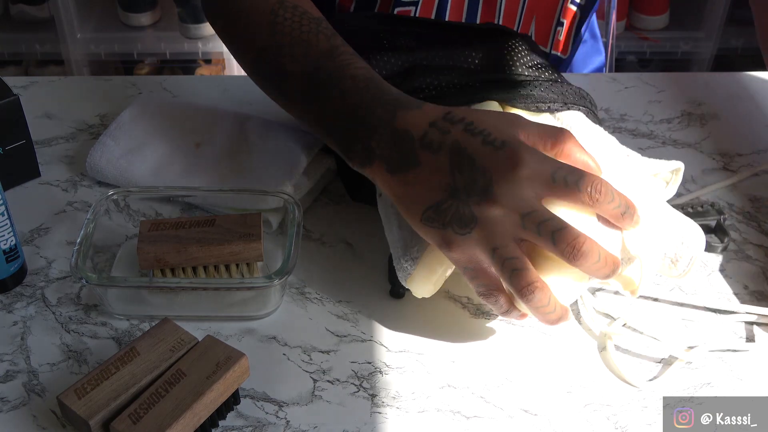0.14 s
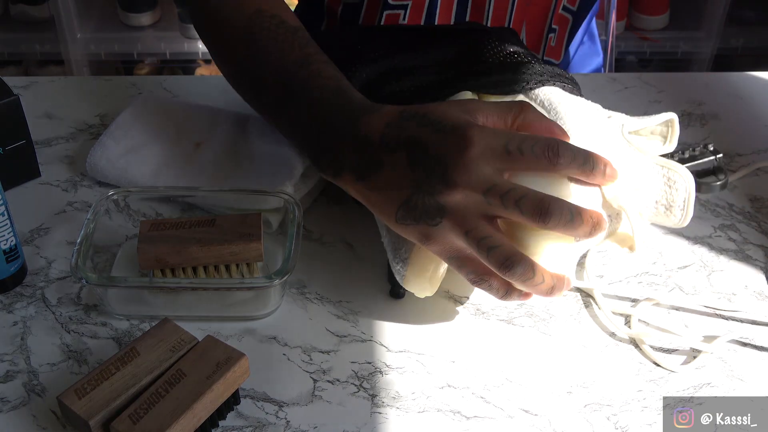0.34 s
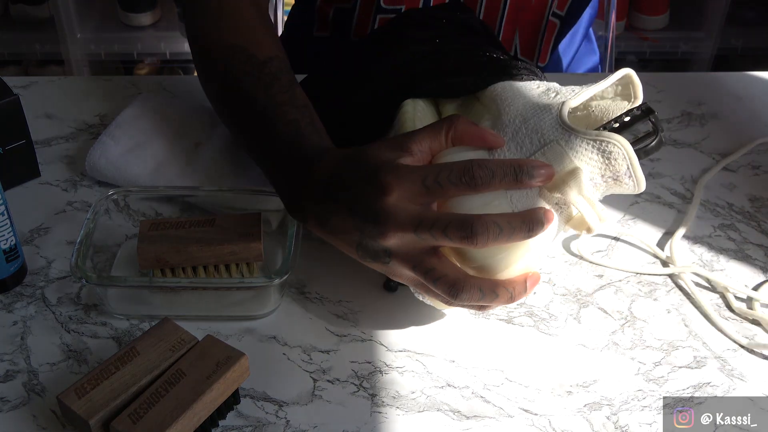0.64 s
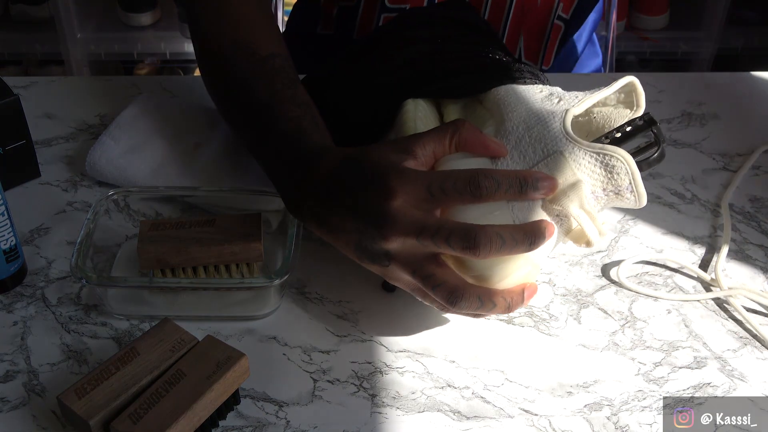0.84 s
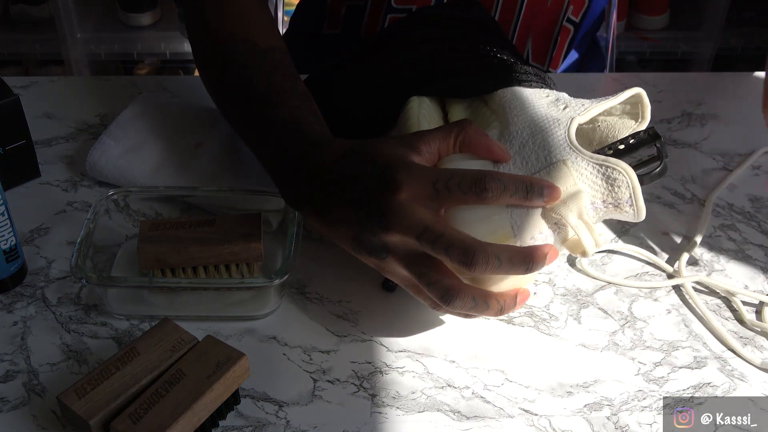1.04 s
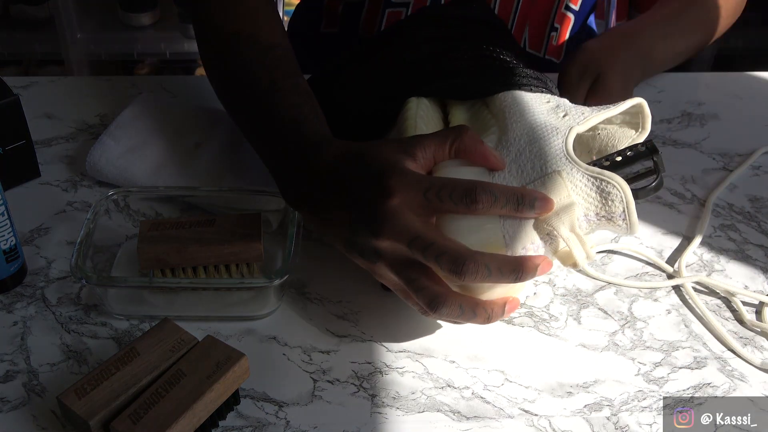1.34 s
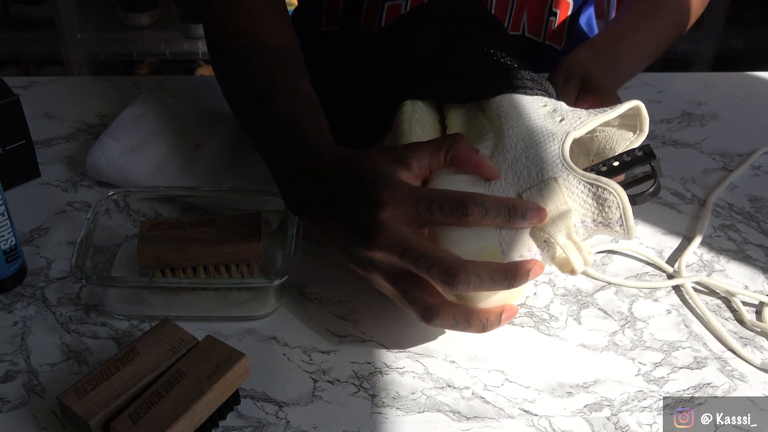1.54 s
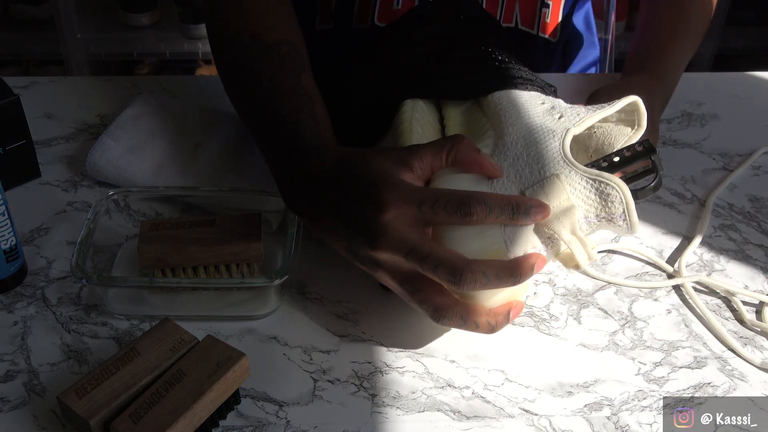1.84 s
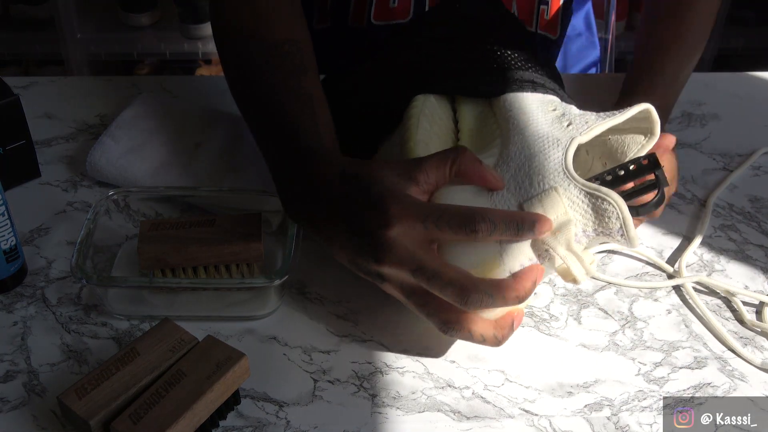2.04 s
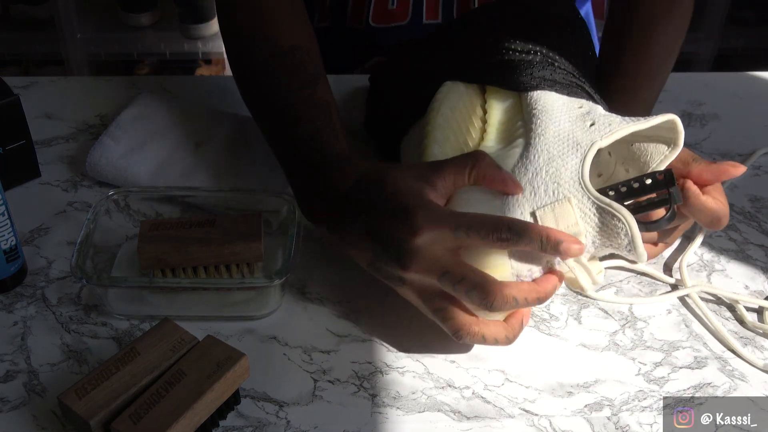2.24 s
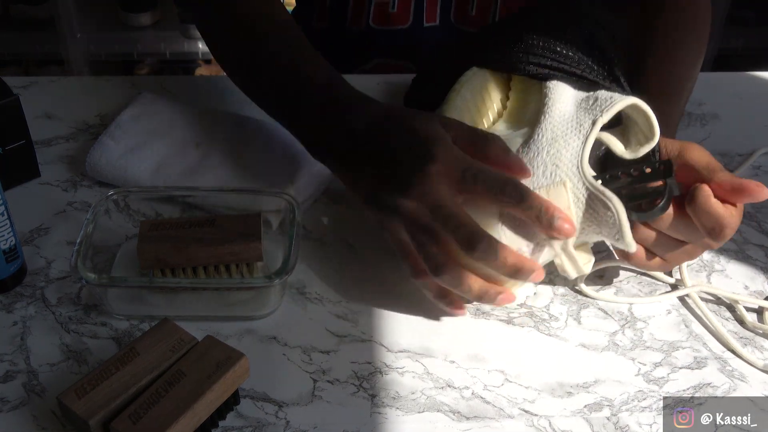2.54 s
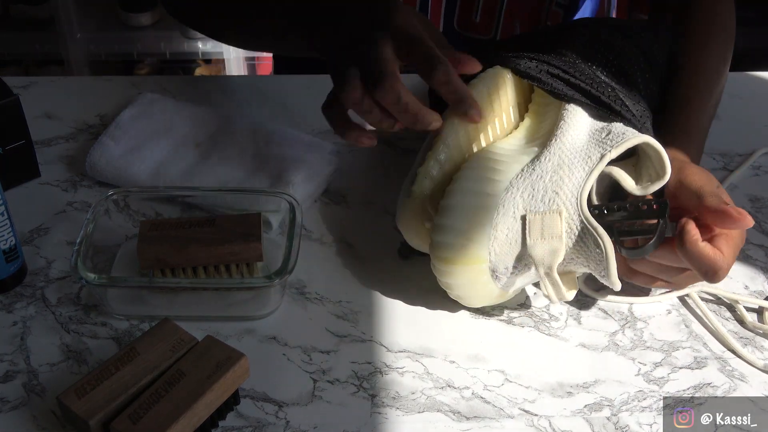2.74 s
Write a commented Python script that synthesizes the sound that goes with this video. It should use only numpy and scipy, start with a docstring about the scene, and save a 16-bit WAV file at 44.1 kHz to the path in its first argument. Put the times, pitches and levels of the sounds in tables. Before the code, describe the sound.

Close up in a small, slightly echoing room, shoes rub and knock on a hollow counter as a hand shifts their mesh bag: busy start, near-quiet middle, then fresh scrapes, thuds and light plastic clacks.

```python
"""Soles drag on a hollow countertop and mesh scrapes; almost at once a thud and a clack fall on top.
Close by in a small room, a hand pushes shoes about in a mesh bag. Friction grains and noise make the
drag, scrape and cloth hiss; slow bass booms under them over a steady floor. Soft pushes ring the counter
as thuds, quick contacts ring a hollow plastic insert as clacks, and short noise bursts tick as lace tips.
The hits return from the room; at the microphone the deepest bass is lost and the top is cut."""
import sys
import numpy as np
from scipy import signal
from scipy.io import wavfile

SR = 44100
rng = np.random.default_rng(int(sys.argv[2]) if len(sys.argv) > 2 else 0)


def to_wav(sig):
    """Store sig (one row per channel, or 1-D mono) as 16-bit WAV at the path in sys.argv[1].

    Samples outside -1..1 are clipped; the rate is SR.
    """
    pcm = np.clip(np.atleast_2d(sig), -1, 1) * 32767
    pcm = np.round(pcm).astype(np.int16)
    wavfile.write(sys.argv[1], SR, pcm.T)  # frames by channels


N = 127890


def amp(db):
    """dB to gain."""
    return 10 ** (np.asarray(db) / 20)


def rms_one(x):
    """Scale to rms 1."""
    return x / np.sqrt(np.mean(x ** 2) + 1e-20)


def level(rows, column=1):
    """Gain over time, interpolated in dB between the rows of a table."""
    columns = np.transpose(rows)
    return amp(np.interp(np.arange(N) / SR, columns[0], columns[column]))


def band(x, low_hz, high_hz, order=2):
    """Band-pass."""
    return signal.sosfilt(signal.butter(order, [low_hz, high_hz], "band", fs=SR, output="sos"), x)


def steep(x, hz, kind):
    """Third-order low- or high-pass."""
    return signal.sosfilt(signal.butter(3, hz, kind, fs=SR, output="sos"), x)


def drift(rate_hz):
    """Slow random wander of rms 1: noise through two equal low-pass poles."""
    step = 40  # samples between the slow values
    pole = np.exp(-2 * np.pi * step * rate_hz / SR)
    noise = rng.standard_normal(N // step + 2002)
    slow = signal.lfilter([1], [1, -2 * pole, pole * pole], noise)[2000:]  # drop the settling
    return np.interp(np.arange(N) / step, np.arange(len(slow)), rms_one(slow))


def ring(x, hz, t60):
    """A damped mode: a unit click sets a sine of height 1 ringing, 60 dB down after t60 seconds."""
    r = amp(-60 / (t60 * SR))
    w = 2 * np.pi * hz / SR
    return signal.lfilter([0, np.sin(w)], [1, -2 * r * np.cos(w), r * r], x + 1e-18)


def grains(per_s, spread_db):
    """Random clicks of uneven size and either sign, as friction slips; rms 1."""
    size = amp(spread_db * np.minimum(rng.exponential(1, N), 5)) * rng.choice([-1, 1], N)
    return rms_one(size * (rng.random(N) < per_s / SR))


def coloured(pair, spectrum, patchy_db):
    """Half-octave bands, taken in turn from two signals, each with its level and flicker; rms 1."""
    table_hz, table_db = np.transpose(spectrum)
    edges = 30 * 2 ** np.arange(0, 9.3, .5)
    out = 0
    for k, (low, high) in enumerate(zip(edges, edges[1:])):
        mid = np.sqrt(low * high)
        if table_hz[0] < mid < table_hz[-1] * 1.1:
            db = np.interp(np.log(mid), np.log(table_hz), table_db)
            out = out + band(pair[k % 2], low, high) * amp(db + patchy_db * drift(8.8))
    return rms_one(out)


def sliding(rows, spectrum, per_s, spread_db, smooth, modes, modes_gain, patchy_db):
    """Friction grains on smooth noise, partly coloured broadly, partly ringing a body."""
    gain = level(rows)
    rub = np.array([grains(per_s, spread_db) + smooth * rng.standard_normal(N) for _ in range(2)])
    body = sum(amp(db) * ring(rub[0] * gain * modes_gain, hz, t60) for hz, db, t60 in modes)
    # expected rms of the ringing modes under a steady rub
    mode_power = sum(amp(db) ** 2 * t60 * SR / (4 * np.log(1000)) for hz, db, t60 in modes)
    body_rms = np.sqrt(mode_power * np.mean(rub ** 2))
    return gain * coloured(rub, spectrum, patchy_db) + body / body_rms


def add(out, s, x):
    """Mix x in at time s."""
    i = max(int(s * SR), 0)
    out[i:i + len(x)] += x[:len(out) - i]


# soles dragging on the counter: [t/s, level/dB, gain of the part above the split/dB]
DRAG = [(0, -21, 7.5), (.04, -23.5, 3), (.08, -26, 0.5), (.2, -26.5, 1), (.26, -35.5, -2.5),
        (.38, -45.5, -1), (.5, -40, 3.5), (.6, -37, 1.5), (.73, -29.5, 0.5), (.88, -37.5, -2),
        (.96, -48.5, 2.5), (1.05, -46, 1), (1.2, -62.5, 1.5), (1.27, -57.5, 1), (1.32, -38.5, 3.5),
        (1.39, -42.5, -4.5), (1.46, -35.5, 0.5), (1.515, -44, 5), (1.55, -34, 4.5), (1.61, -42.5, 5),
        (1.68, -47.5, -3), (1.74, -42, 2), (1.82, -51, -4), (1.87, -42.5, -3), (2.07, -45.5, 1.5),
        (2.14, -33.5, 1), (2.28, -27, -3), (2.35, -33.5, -2), (2.42, -30, 5.5), (2.5, -35, 6),
        (2.56, -44, 0), (2.64, -41, 0.5), (2.69, -32.5, 1), (2.8, -27.5, -1.5), (2.9, -35, -11)]
# broad colour of the drag: [f/Hz, level/dB per Hz]
DRAG_COLOUR = [(53, -43), (90, -16), (166, -18), (263, 6), (285, -11), (353, 1), (397, -6), (520, -3),
               (698, -13.5), (1500, -13), (1950, -55), (3300, -120)]
# modes of the hollow counter, also rung by the thuds: [f/Hz, level/dB, full t60/s]
COUNTER_MODES = [(126.5, -21, 0.36), (171.5, 2, 0.3), (213, -12, 0.059), (283.4, -9.5, 0.16),
                 (353.4, 2, 0.25), (417, -8, 0.39), (518.3, -9.5, 0.25), (661.6, -5.5, 0.12),
                 (849, -9, 0.072)]
DRAG_SLIPS_PER_S, DRAG_IN_COUNTER_DB, DRAG_SPLIT_HZ = 500, -7.5, 389


def sole_drag():
    """Slips of the soles rub broadly and ring the counter; the part above the split swells on its own."""
    drag = sliding(DRAG, DRAG_COLOUR, DRAG_SLIPS_PER_S, 3.53, 0.53,
                   COUNTER_MODES, amp(DRAG_IN_COUNTER_DB), patchy_db=4.4)
    upper = level(DRAG, 2) * steep(drag, DRAG_SPLIT_HZ, "high")
    return steep(drag, DRAG_SPLIT_HZ, "low") + upper


# mesh scraping over shoe and counter: [t/s, level/dB]
SCRAPE = [(0, -33.5), (.1, -31.5), (.14, -30), (.23, -31), (.27, -36.5), (.39, -49.5), (.47, -42.5),
          (.55, -37), (.62, -38), (.68, -37), (.725, -35.5), (.76, -30.5), (.86, -49), (.98, -58.5),
          (1.03, -49), (1.27, -69), (1.33, -51), (1.39, -52.5), (1.43, -43), (1.52, -53.5), (1.55, -52),
          (1.6, -51), (1.65, -58.5), (1.75, -54), (1.82, -65), (1.86, -43.5), (1.9, -46), (2.01, -50.5),
          (2.09, -43), (2.22, -34), (2.3, -43.5), (2.41, -34.5), (2.49, -35), (2.54, -47), (2.62, -47),
          (2.75, -42), (2.82, -32.5), (2.9, -46.5)]
# broad colour of the scrape: [f/Hz, level/dB per Hz]
SCRAPE_COLOUR = [(410, -33), (700, 12), (874, -5.5), (1140, -11), (1730, -3.5), (2080, 2), (2430, 0.5),
                 (3430, 2), (5240, -25), (7000, -8), (9100, -63), (15400, -120)]
# how much of the scrape passes into the insert's held, damped modes: [t/s, level/dB]
SCRAPE_INTO_INSERT = [(0, -2), (.3, -17), (.6, -19), (.68, -2), (.9, 1), (1.0, -20), (1.3, -13),
                      (1.42, -19), (1.7, -6), (1.9, -8), (2.1, -12), (2.6, -28), (2.7, -3), (2.9, 0)]
# modes of the hollow plastic insert, also rung by the clacks: [f/Hz, level/dB, full t60/s]
INSERT_MODES = [(1085, 1, .35), (1195, -4, .35), (1250, -5, .25), (2245, 0, 1.0), (2290, -6, .5),
                (3370, -5, .45), (3450, -6, .5), (3520, -5, .7), (3630, -11, .3), (4340, -18, .2),
                (4780, -13, .1), (6840, -25, .25), (7050, -27, .2), (8250, -28, .3)]
SCRAPE_GRAINS_PER_S, HELD_T60_S = 2500, .05


def mesh_scrape():
    """Dense friction grains scrape broadly and ring the insert, whose modes are held short."""
    held = [(hz, db, HELD_T60_S) for hz, db, t60 in INSERT_MODES]
    return sliding(SCRAPE, SCRAPE_COLOUR, SCRAPE_GRAINS_PER_S, 3.64, 0.74,
                   held, level(SCRAPE_INTO_INSERT), patchy_db=-0.1)


# sliding of cloth on cloth: [t/s, level/dB]
HISS = [(0, -39.5), (.08, -52), (.11, -39), (.15, -43), (.26, -47), (.36, -58), (.47, -41.5), (.53, -45),
        (.58, -43.5), (.64, -44.5), (.67, -59), (.75, -46.5), (.84, -60), (.92, -56.5), (1.02, -58.5),
        (1.22, -71), (1.44, -54), (1.51, -57.5), (1.58, -48.5), (1.66, -58), (1.71, -56), (1.81, -60),
        (1.9, -45.5), (1.99, -53), (2.12, -43), (2.24, -36), (2.3, -44), (2.43, -33), (2.49, -35),
        (2.54, -49), (2.63, -45), (2.75, -55), (2.82, -60), (2.9, -49)]
# colour of the hiss: [f/Hz, level/dB per Hz]
HISS_COLOUR = [(590, -29), (1000, 1), (1530, -15), (1850, -33), (3700, 0), (5230, -4.5), (8020, -7),
               (14600, -13.5), (15900, -25)]


def cloth_hiss():
    """Smooth noise with fine friction grains in it, coloured as a fine hiss."""
    rub = rng.standard_normal((2, N)) + 0.72 * grains(2900, 4.3)
    return level(HISS) * coloured(rub, HISS_COLOUR, patchy_db=-0.2)


# the counter's deep boom as weight shifts on it: [t/s, level/dB]
BOOM = [(0.0, -41), (0.1, -67), (0.13, -64), (0.24, -73), (0.59, -59), (0.67, -39.5), (1.22, -74),
        (1.31, -61), (1.57, -73), (1.61, -52), (1.79, -78), (2.08, -64.5), (2.2, -47), (2.24, -52),
        (2.6, -66), (2.66, -39), (2.75, -46), (2.9, -40)]
BOOM_HZ, BOOM_T60_S = 62, .3


def counter_boom():
    """Noise keeps one deep mode of the counter ringing; its level follows the table."""
    return level(BOOM) * rms_one(ring(rng.standard_normal(N), BOOM_HZ, BOOM_T60_S))


# colour of the steady background: [f/Hz, level/dB per Hz]
FLOOR_COLOUR = [(24, -59), (40, -21), (123, 0), (289, 6), (344, -4.5), (1230, -27), (1670, -23),
                (3200, -42.5), (15900, -37.5)]
FLOOR_DB = -48.5


def noise_floor():
    """Faint steady noise whose bands flicker slightly."""
    return amp(FLOOR_DB) * coloured(rng.standard_normal((2, N)), FLOOR_COLOUR, patchy_db=1.8)


# soles and knuckles on the counter: [t/s, level/dB before the set level, push and upper modes/dB,
# share of the full ring time, softness as low-pass f/Hz]
THUDS = [(.0035, -14, 9, 1, 1540), (0.045, -13, 8.5, 0.68, 600), (.128, -4, 1.5, 0.83, 960),
         (.278, -31, 9, 0.45, 710), (0.491, -32.5, 12.5, 0.64, 796), (0.619, -16, -10, 0.8, 600),
         (0.64, -3.5, -9, 0.1, 500), (0.6588, 1, -2.5, 0.2, 1180), (0.699, -3, -3, 0.15, 1220),
         (0.707, -12.5, -22, 0.25, 500), (.995, -33, 16.5, 0.35, 900), (1.278, -18, -14, 0.14, 400),
         (1.412, -3.5, -7.5, 0.53, 700), (1.447, -11, 4.5, 0.13, 830), (1.488, -26.5, 3.5, 0.7, 800),
         (1.538, -31, 20, 0, 910), (1.566, -27.5, 12, 0.22, 890), (1.6, -16, -2, 0.35, 600),
         (1.667, -25, -19, 0.3, 500), (1.717, -35, 13, 0.7, 620), (1.869, -32, 7.5, 0.6, 605),
         (2.089, -28.5, 12, 0.9, 710), (2.175, -8, -12, 0.2, 696), (2.202, -19, 5, 0, 900),
         (2.287, -24, 10, 1, 610), (2.366, -25.5, 11, 0.24, 810), (2.397, -23, 11, 0.8, 970),
         (2.409, -25.5, 10, 0.54, 800), (2.458, -20.5, 4, 0.36, 1100), (2.485, -27, 9, .3, 905),
         (2.651, -4, -9.5, 0.14, 796), (2.716, -2, -2, 0.24, 1150), (2.787, -11, 1, 0.29, 680),
         (2.806, -15.5, 4.5, 0.1, 666)]
THUD_SET_DB, PUSH_DB, UPPER_FROM_HZ = -12.5, 6.5, 250


def thuds():
    """A soft downward push, heard itself, rings the counter; the hand damps it more or less."""
    out = np.zeros(N)
    click = signal.unit_impulse(SR // 2)
    for s, db, upper_db, share, soft_hz in THUDS:
        push = -steep(click + 1e-18, soft_hz, "low")
        damping = np.clip(share, .05, 1.5)
        body = sum(amp(mode_db + upper_db * (hz > UPPER_FROM_HZ)) * ring(push, hz, t60 * damping)
                   for hz, mode_db, t60 in COUNTER_MODES)
        direct = amp(PUSH_DB + upper_db) * push / -push.min()
        add(out, s, amp(db + THUD_SET_DB) * (body + direct))
    return out


# clacks of the insert: [t/s, level/dB before the set level, brightness/dB per octave,
# share of the full ring time]
CLACKS = [(.0044, -10, -9, .2), (.9946, -36, -8, .3), (2.200, -28, -9, .3), (2.2672, -26, -14, .3),
          (2.6753, -24, -12, .4), (1.3054, -29, -4, .2), (1.705, -31, -10, .25), (1.7494, -42, -5, .2),
          (1.8317, -25, -9, .3), (2.7596, -18, -7, .3), (2.7796, -18, 3.5, 1.1)]
# strengths of the quick contacts in one clack: [gain]
CONTACTS = [1, .35, .25, .15]
# SPLIT_SHARE scales the random detuning inside a pair, as a share of the mode's frequency
CLACK_SET_DB, CONTACT_S, SPLIT_SHARE = -18, .003, .02


def clacks():
    """A few quick contacts ring the insert; each mode is a close uneven pair; harder contact is brighter."""
    out = np.zeros(N)
    luck = rng.uniform(-1.1, 1, (len(CLACKS), len(INSERT_MODES), 2))
    for (s, db, tilt_db, share), chances in zip(CLACKS, luck):
        for (hz, mode_db, full_t60), (spacing, split) in zip(INSERT_MODES, chances):
            hit = np.zeros(SR // 2)
            gap = CONTACT_S * SR * (1 + spacing / 2)
            hit[(np.arange(len(CONTACTS)) * gap).astype(int)] = CONTACTS
            t60 = full_t60 * max(share, .05)
            twin = .5 * ring(hit, hz * (1 + SPLIT_SHARE * split), t60 / 2)
            bright_db = tilt_db * np.log2(hz / INSERT_MODES[0][0])
            add(out, s, amp(db + CLACK_SET_DB + mode_db + bright_db) * (ring(hit, hz, t60) + twin))
    return out


# dry ticks of lace tips and mesh threads: [t/s, starting level/dB before the set level,
# lowest f/Hz, highest f/Hz, t60/s]
TICKS = [(.029, -33, 1000, 4000, 0.017), (.103, -16, 2500, 8000, 0.023), (0.126, -3.5, 1980, 15700, 0.0047),
         (.129, -13.5, 1500, 8900, .02), (.573, -11, 2180, 5560, 0.022), (.659, -12, 905, 3700, 0.02),
         (.7216, -24, 1500, 6860, 0.033), (.755, -30, 7000, 12000, .015), (0.9953, -31, 1000, 4970, 0.025),
         (1.277, -42, 1500, 9000, .02), (1.3694, -39, 4000, 14000, 0.016),
         (1.4042, -25.5, 1500, 7400, 0.019), (1.482, -30, 1500, 6960, 0.024),
         (1.5296, -19.5, 600, 3100, 0.034), (1.529, -25.5, 5000, 15000, .02), (1.54, -22.5, 600, 3160, .03),
         (1.5375, -25, 5000, 15000, 0.013), (1.559, -31, 900, 3180, .03),
         (1.5605, -24.5, 5000, 14900, 0.019), (1.569, -25, 700, 2970, 0.012),
         (1.5675, -25, 5000, 15000, 0.022), (0.861, -20, 503, 2270, 0.031), (.843, -14, 400, 1500, .02),
         (2.788, -28, 1500, 8700, 0.042), (1.696, -36, 4000, 14000, 0.016),
         (1.748, -36, 4000, 14200, 0.019), (2.014, -30, 4000, 13900, .015), (2.091, -27, 1000, 5960, .02),
         (2.396, -20, 1500, 4000, .02), (2.422, -26, 1500, 4950, 0.011), (2.651, -28, 790, 4030, 0.024),
         (2.7146, -18, 790, 3640, 0.017), (2.7575, -33, 1500, 6500, 0.013), (2.780, -33, 2000, 9000, 0.014)]
TICK_SET_DB = -11


def ticks():
    """Short decaying bursts of noise, each with its own range and length."""
    out = np.zeros(N)
    t = np.arange(SR // 10) / SR
    for s, db, low_hz, high_hz, t60 in TICKS:
        top_hz = np.clip(high_hz, low_hz * 1.3, 18000)
        noise = rms_one(band(rng.standard_normal(len(t)), low_hz, top_hz))
        add(out, s, amp(db + TICK_SET_DB - 60 * t / max(t60, .002)) * noise)
    return out


ROOM_T60_S, ROOM_DB, WALL_CUT_HZ, ROOM_LOW_HZ = .4, -14, 5100, 253


def room(x):
    """Small-room echoes: ten feedback delays of 11 to 34 ms, duller on every round."""
    out = np.zeros(N)
    dull = np.exp(-2 * np.pi * WALL_CUT_HZ / SR)
    for k, lag in enumerate((np.geomspace(.011, .034, 10) * SR).astype(int)):
        loop = x.copy()
        gain = amp(-60 * lag / SR / ROOM_T60_S)
        state = [0.]
        for i in range(lag, N, lag):
            back, state = signal.lfilter([gain * (1 - dull)], [1, -dull], loop[i - lag:i], zi=state)
            loop[i:i + lag] += back[:N - i]
        out += (loop - x) * (-1) ** k  # echoes only, alternating in sign
    return out


LOW_CUT_HZ = 85


def scene():
    """The sliding layers, floor and hits with their room sound, cut low twice; the boom is left whole."""
    layers = sole_drag() + mesh_scrape() + cloth_hiss() + noise_floor()
    hits = thuds() + clacks() + ticks()
    echoes = amp(ROOM_DB) * room(steep(hits, ROOM_LOW_HZ, "high"))
    near = layers + hits + echoes
    thinned = steep(steep(near, LOW_CUT_HZ, "high"), LOW_CUT_HZ, "high")
    return (thinned + counter_boom())[None]


CUTOFF_HZ = 16250


def record(dry):
    """At the microphone the deepest bass is lost and the top is cut sharply."""
    low = signal.sosfilt(signal.butter(2, 45, "high", fs=SR, output="sos"), dry)
    return signal.sosfilt(signal.cheby2(14, 70, CUTOFF_HZ, fs=SR, output="sos"), low)


dry = scene()
out = record(dry)
to_wav(out)
```